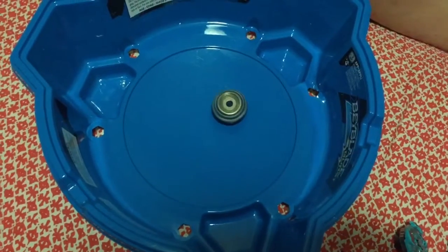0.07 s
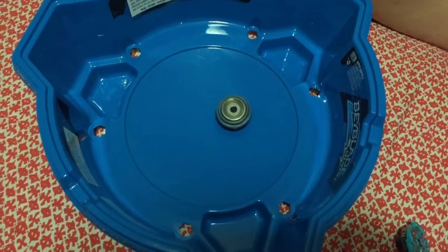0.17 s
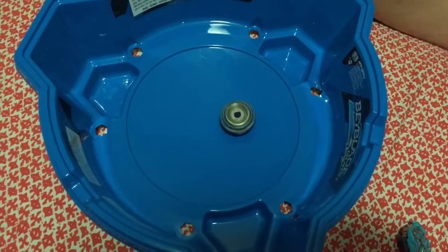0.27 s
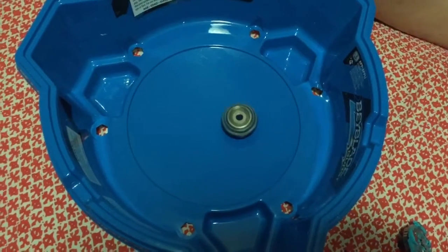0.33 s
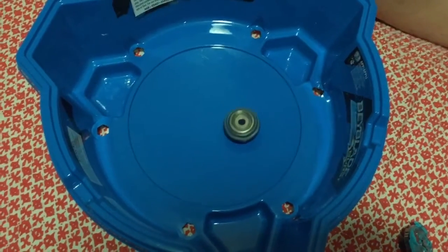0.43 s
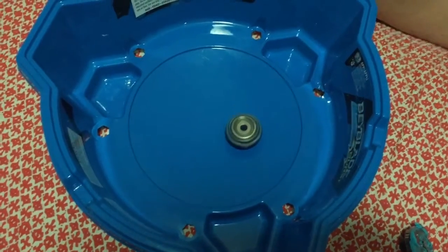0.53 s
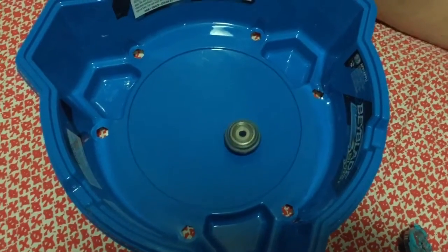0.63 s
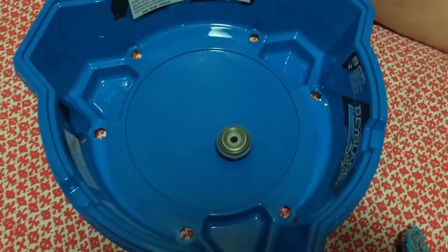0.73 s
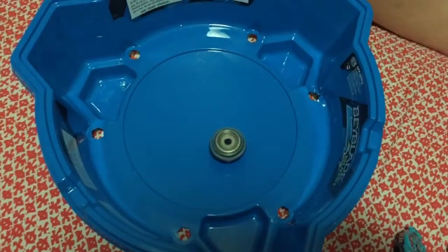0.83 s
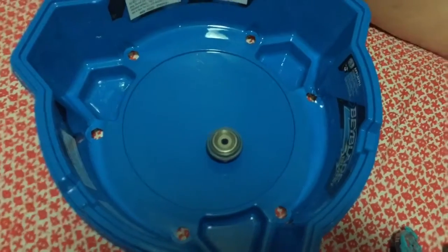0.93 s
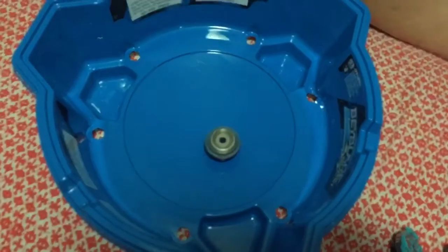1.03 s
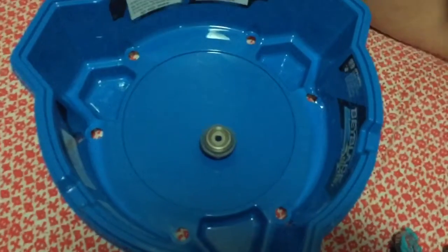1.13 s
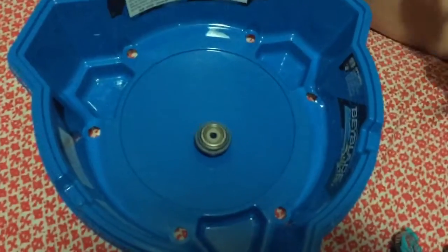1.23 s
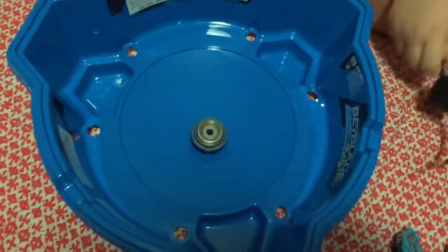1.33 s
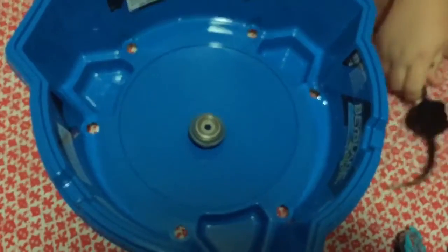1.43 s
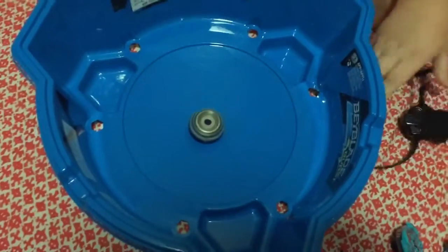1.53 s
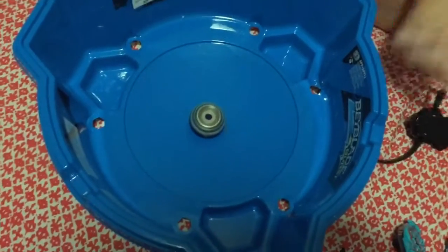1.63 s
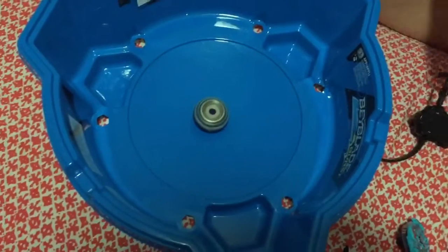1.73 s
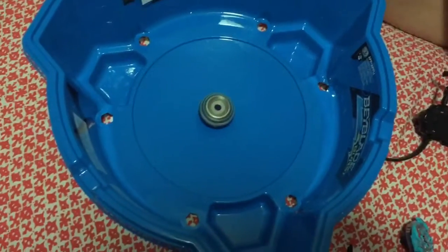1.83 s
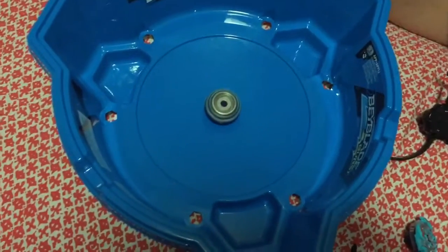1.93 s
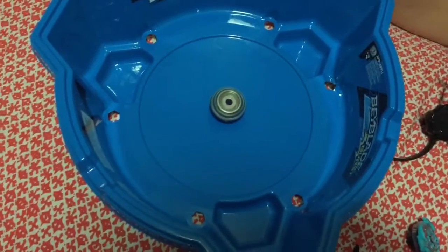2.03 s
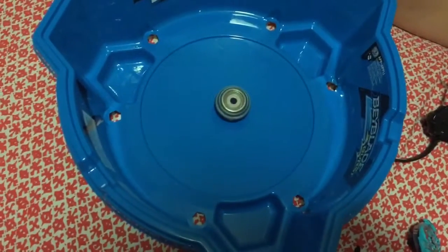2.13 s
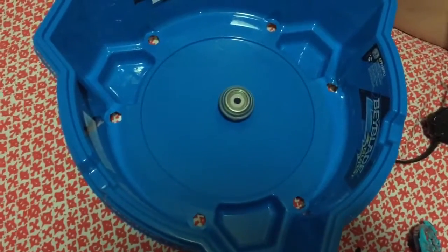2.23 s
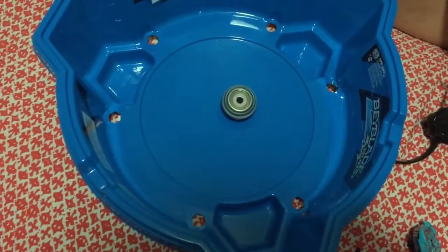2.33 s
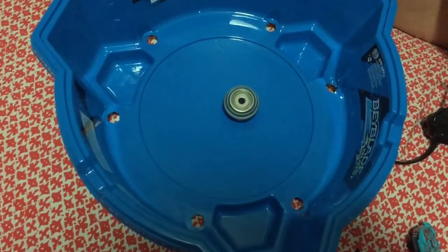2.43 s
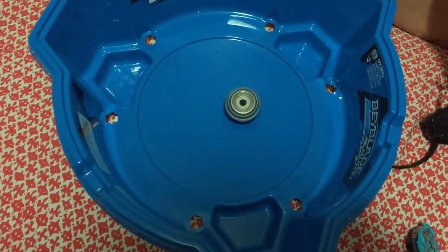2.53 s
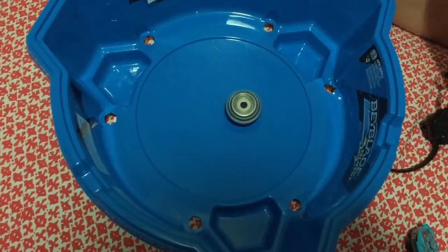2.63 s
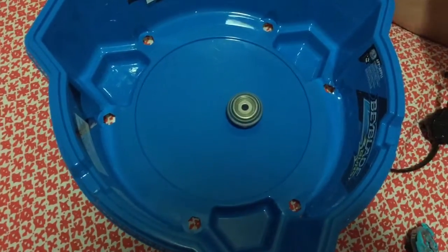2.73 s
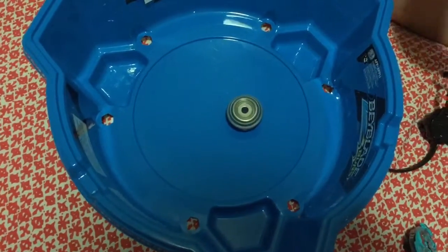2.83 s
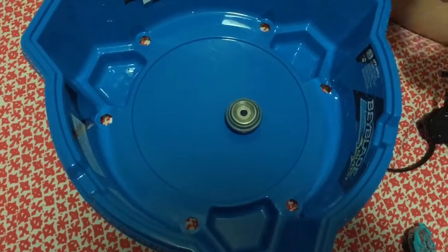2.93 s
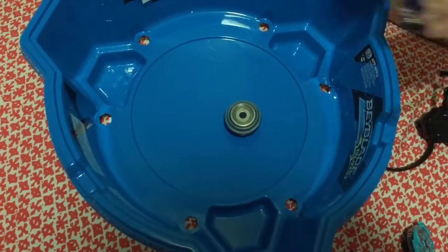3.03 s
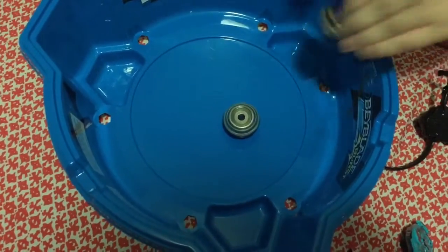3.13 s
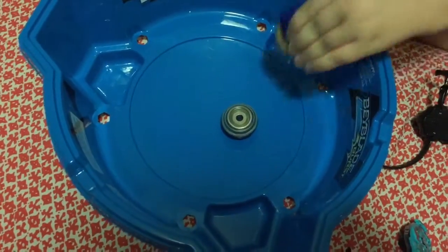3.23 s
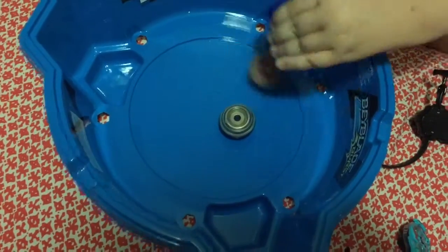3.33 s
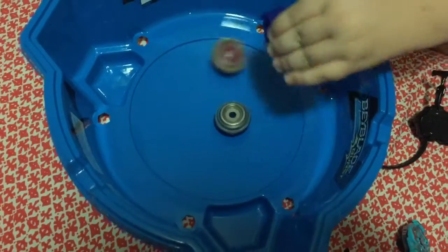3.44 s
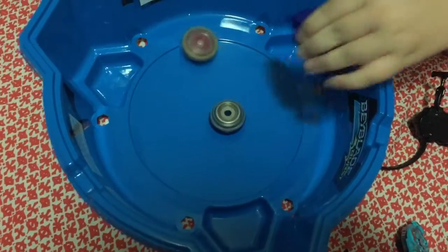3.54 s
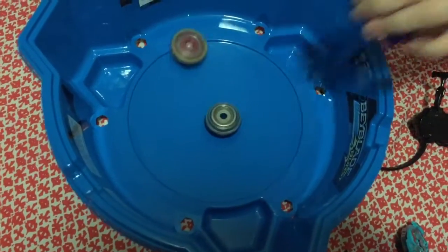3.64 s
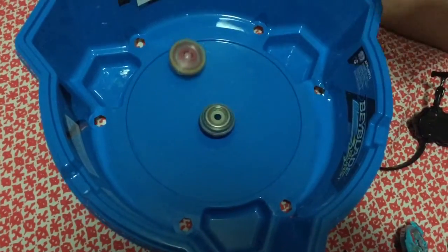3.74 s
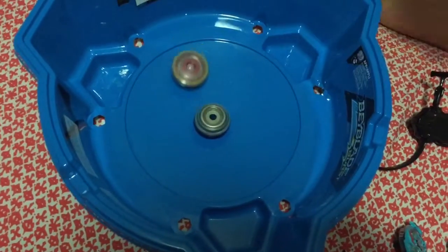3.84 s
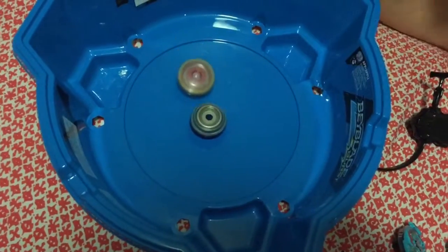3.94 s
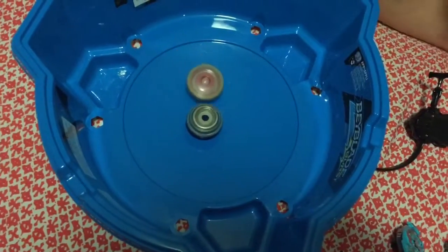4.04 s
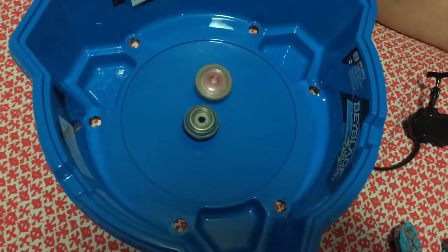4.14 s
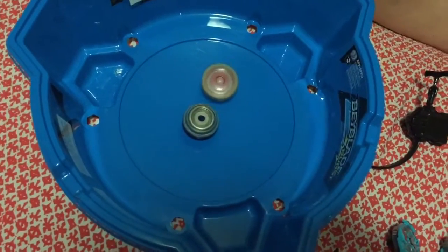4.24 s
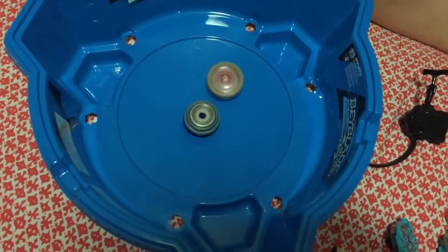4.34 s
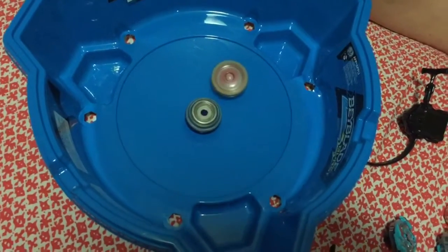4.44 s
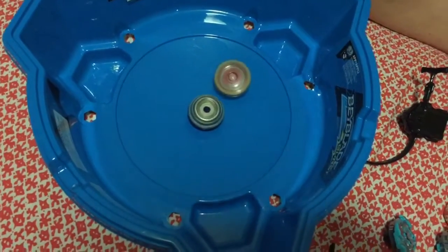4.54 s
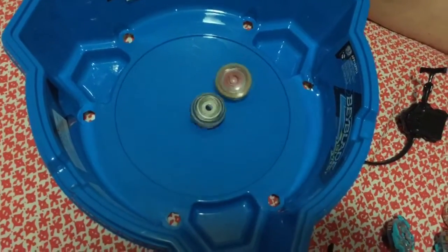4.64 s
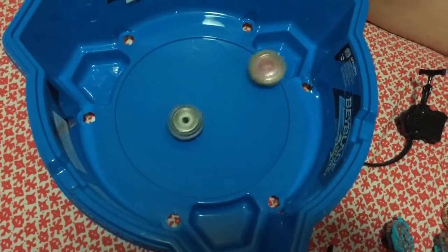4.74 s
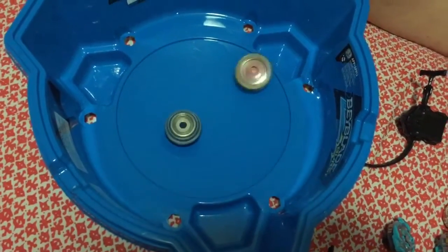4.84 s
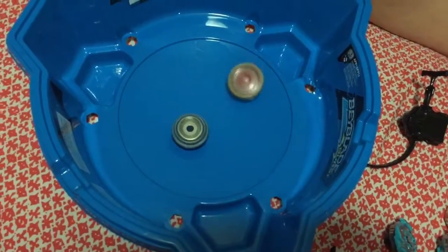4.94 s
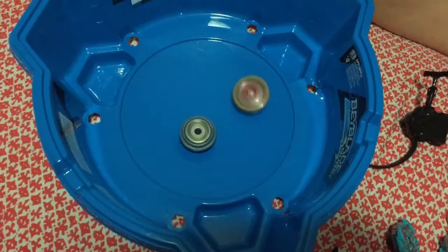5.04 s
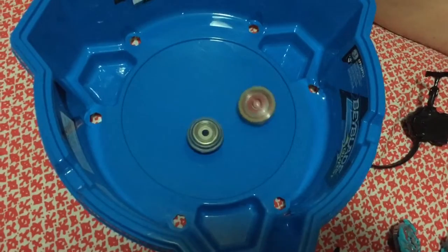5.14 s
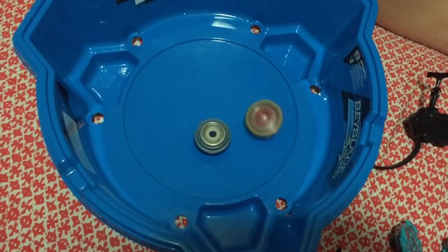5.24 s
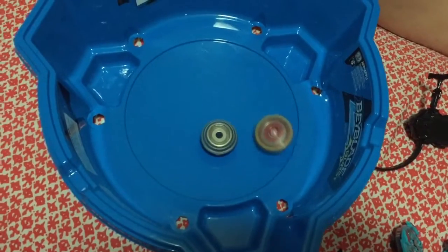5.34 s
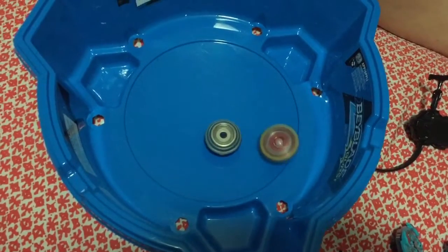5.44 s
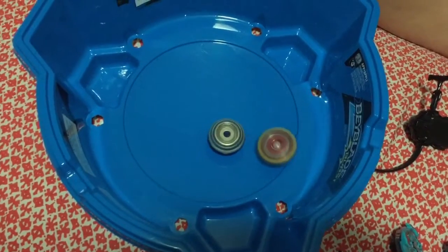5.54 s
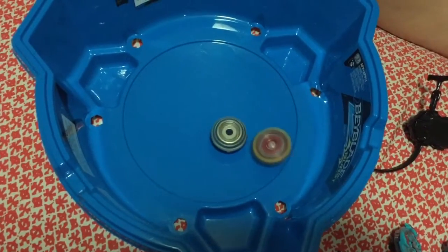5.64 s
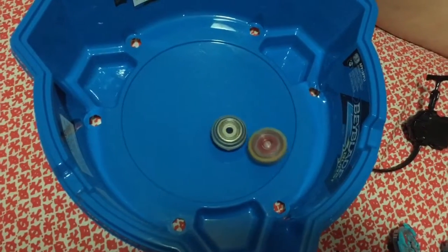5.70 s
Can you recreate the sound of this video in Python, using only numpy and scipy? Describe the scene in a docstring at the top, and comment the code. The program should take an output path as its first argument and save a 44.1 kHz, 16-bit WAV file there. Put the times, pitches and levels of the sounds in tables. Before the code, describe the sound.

Plastic clicks and a quick toothed rasp launch a second top into a hollow bowl, where it hums, scrapes and strikes the first sharply.

```python
"""Two spinning tops in a thin plastic bowl, heard from close above in a small room.
One top hums and grinds alone, its tip shaking the bowl, while the second is clicked onto its launcher.
Fingers rub and tick on the launcher's case, then the toothed ripcord rasps and the launcher's parts rattle.
The second top drops in, bounces and circles with a higher hum; two hard cracks and fainter ones mark top on top.
It skitters in small hops and grinds on the floor of the bowl; at the end the cord is fed back in, tooth by tooth."""
import sys
import numpy as np
from scipy import signal
from scipy.fft import rfft, irfft, next_fast_len
from scipy.io import wavfile
from scipy.ndimage import uniform_filter1d

SR = 44100
rng = np.random.default_rng(int(sys.argv[2]) if len(sys.argv) > 2 else 0)


def materialize(psi):
    """Save the field psi as 16-bit PCM at rate SR to the path in sys.argv[1].

    A 1-D psi becomes a single channel; in a 2-D psi each row is a channel.
    """
    bounded = np.clip(np.atleast_2d(psi).T, -1, 1)
    quanta = np.round(bounded * 32767).astype(np.int16)
    wavfile.write(sys.argv[1], SR, quanta)


N = 254456
TIME = np.arange(N) / SR

# tone colour of the second tip on the floor of the bowl: pitch_hz [Hz], level_db [dB]
GRIND_COLOUR = [(200, -11.5), (400, 2), (550, -9), (770, -5), (1120, -8.5), (2120, -12), (2790, -16),
                (3500, -16), (5000, -26), (10000, -34), (15000, -36)]
# resonances of the launcher's body: pitch_hz [Hz], width_hz [Hz], level_db [dB]
LAUNCHER_RINGS = [(2145, 42, 5.4), (2250, 23, 4.9), (2350, 12, 2), (2773, 45, 10), (2990, 290, 6.4),
                  (3900, 77, 2.3), (4300, 80, 5), (5320, 17, 1.7), (5725, 600, 5.7), (6170, 39, 5.1),
                  (6670, 60, 4.1)]
# how a run on the edge of the tip begins and ends
RUN_ATTACK_S, RUN_RELEASE_S = 0.022, 0.24


def amp(db):
    """Turn decibels into a gain."""
    return 10 ** (np.asarray(db) / 20)


def rms_one(x):
    """Scale a sound to unit power."""
    return x / np.sqrt(np.mean(x ** 2) + 1e-20)


def curve(rows):
    """Draw straight lines through a table of (time, value)."""
    rows = np.array(rows)
    return np.interp(TIME, rows[:, 0], rows[:, 1])


def swell(start, length, attack_s, release_s, power=1):
    """Rise, hold to the end of the length, then die away by 60 dB in the release time."""
    rise = np.clip((TIME - start) / attack_s, 0, 1) ** power
    return rise * amp(-60 * np.clip((TIME - start - length) / release_s, 0, 2))


def strokes(rows, attack_s, release_s, axis=2):
    """Gain through time of strokes (start, length, dB, ...); overlapping strokes add in power."""
    power = sum((amp(row[axis]) * swell(row[0], row[1], attack_s, release_s)) ** 2 for row in rows)
    return np.sqrt(power)


def drift(per_s):
    """Random wandering around zero, with per_s new random points a second joined by lines."""
    return np.interp(TIME * per_s, np.arange(4096), rng.standard_normal(4096))


def coloured(x, colour, rings=(), tilt_db=0):
    """Causal (minimum-phase) filter: a broad colour, resonant peaks and a tilt per octave above 1 kHz."""
    size = 2 * next_fast_len(len(x))
    hz = np.maximum(np.arange(size // 2 + 1) * SR / size, 10)
    points = np.array(colour)
    db = np.interp(np.log(hz), np.log(points[:, 0]), points[:, 1])
    db = db + tilt_db * np.log2(np.maximum(hz / 1000, 1))
    for centre, width, peak_db in rings:
        db = db + peak_db / (1 + (2 * (hz - centre) / width) ** 2)
    # folding the cepstrum forward in time puts all of the response after its cause
    cepstrum = irfft(db * np.log(10) / 20)
    cepstrum[1:size // 2] *= 2
    cepstrum[size // 2 + 1:] = 0
    return irfft(rfft(x, size) * np.exp(rfft(cepstrum)))[:len(x)]


def varied(rings, spread_db):
    """Every point of contact favours other resonances."""
    return [(hz, width, db + spread_db * rng.standard_normal()) for hz, width, db in rings]


def rubbed(friction, colour, rings, shift_db):
    """Friction through a body whose resonances trade strength as the contact moves."""
    ways = [coloured(friction, colour, varied(rings, shift_db)) for _ in range(3)]
    weights = amp(12 * np.array([drift(25) for _ in ways]))
    blend = sum(rms_one(way) * weight for way, weight in zip(ways, weights))
    return rms_one(blend / weights.sum(axis=0))


def add(out, s, sound):
    """Mix a sound in at a time."""
    start = int(s * SR)
    out[start:start + len(sound)] += sound[:max(N - start, 0)]


def clicks(rows, colour, rings, crack_s, ring_s, ring_db):
    """Hard contacts: a crack and a ring through the body, each dying by 60 dB in its time."""
    out, t = np.zeros(N), TIME[:4096]
    contact_s = 0.0002
    for s, db, tilt_db in rows:
        decay = amp(-60 * t / crack_s) + amp(ring_db - 60 * t / ring_s)
        burst = rng.standard_normal(len(t)) * decay * (1 - np.exp(-t / contact_s))
        hit = coloured(burst, colour, varied(rings, spread_db=2.5), tilt_db)
        # the level is that of a sine as strong as the loudest 1.5 ms
        loudest = np.sqrt(2 * uniform_filter1d(hit ** 2, size=66).max())
        add(out, s, amp(db) * hit / loudest)
    return out


def room_tone():
    """Faint steady background noise, its level set above the bass."""
    # tone colour: pitch_hz [Hz], level_db [dB]
    tone_colour = [(25, -1.5), (45, -8), (75, -11.5), (110, -8), (240, -27.5), (300, -20.5), (500, -34.5),
                   (1740, -34.5), (2760, -33), (5000, -42.5), (6050, -43), (15000, -49.5)]
    noise = coloured(rng.standard_normal(N), tone_colour)
    upper = signal.sosfilt(signal.butter(2, 400, "high", fs=SR, output="sos"), noise)
    return amp(-70) * noise / upper.std()


def turns(spin_hz, wander):
    """Angle of a top whose speed wavers."""
    return 2 * np.pi * np.cumsum(spin_hz * (1 + wander * drift(35))) / SR


def hum(angle, loudness, upright_db, runs, flutter_db):
    """The uneven tip shakes the bowl at multiples of the spin; on its edge they swell into a throb a turn."""
    # overtones: multiple_of_spin [count], level_db [dB]
    overtones = [(4, -1.5), (5, -3.5), (6, -12), (7, -14.5), (8, -16), (9, -26), (10, -21.5), (11, -26),
                 (12, -19)]
    base = amp(curve(loudness))
    third_run = strokes(runs, RUN_ATTACK_S, RUN_RELEASE_S, axis=3)
    buzz_run = strokes(runs, RUN_ATTACK_S, RUN_RELEASE_S, axis=4)
    third = np.hypot(base * amp(upright_db[0]), third_run)
    buzz = np.hypot(base * amp(upright_db[1]), buzz_run)
    low = base * np.sin(2 * angle) + third * np.sin(3 * angle)
    high = sum(amp(db + flutter_db * drift(12)) * np.sin(k * angle) for k, db in overtones)
    return np.sqrt(2) * (low + buzz * high)


def grinding(angle, runs, colour, repeat, throb_db, grain_db):
    """The tip scrapes hardest once each turn; its own roughness repeats, that of the floor does not."""
    # resonances of the bowl's floor: pitch_hz [Hz], width_hz [Hz], level_db [dB]
    floor_rings = [(759, 110, 5), (880, 160, 4.5), (1278, 64, 0.2), (1540, 650, 3.5), (2005, 210, 4.5),
                   (3330, 610, 6)]
    bite = ((1 + np.cos(angle)) / 2) ** 2
    tip = rng.standard_normal(size=800)  # roughness around the tip
    scratch = np.interp(angle / (2 * np.pi) % 1, np.linspace(0, 1, len(tip)), tip)
    floor_grit = rng.standard_normal(N) * amp(grain_db * drift(600))
    grit = repeat * scratch + (1 - repeat) * floor_grit
    scrape = rubbed(grit * amp(throb_db * bite), colour, floor_rings, shift_db=4.0)
    return strokes(runs, RUN_ATTACK_S, RUN_RELEASE_S) * scrape


def loading(grain_db):
    """Plastic slides and slips over the launcher's catch until the top snaps home."""
    # pushes over the catch: start_s [s], length_s [s], level_db [dB, before the slide's trim]
    pushes = [(0.532, .06, -41.5), (0.671, 0.079, -36.5), (0.798, 0.082, -34), (0.942, 0.083, -33)]
    # clicks of the catch: start_s [s], level_db [dB], brightness [dB per octave]
    catch_clicks = [(.261, -30, -0.5), (.519, -24.5, 1), (.545, -15, -1.5), (.595, -21, -.5),
                    (.671, -16.5, 2), (.706, -24.5, -0.5), (.727, -22, 0), (.741, -21.5, 1.5),
                    (.773, -25.5, 2), (.806, -25.5, 0), (.834, -20.5, 4), (.851, -21, 3.5),
                    (.916, -29.5, -0.5), (.965, -21.5, 6.5), (1.004, -17.5, 2), (1.017, -4.5, 1),
                    (1.026, -13.5, -4.5)]
    # tone colours of the slide and of the clicks: pitch_hz [Hz], level_db [dB]
    slide_colour = [(400, -40.5), (750, -21), (1120, -6), (1900, -7.5), (2650, -0.5), (3700, -8),
                    (4300, -4), (5100, -15.5), (7000, -14.5), (14000, -20.5), (16000, -25.5)]
    catch_colour = [(410, -46), (700, -27.5), (1140, -4.5), (2100, -3), (2560, 0), (3840, -9.5),
                    (4320, -9.5), (4920, -15.5), (6400, -9), (7010, -6.5), (13700, -13.5), (15000, -10.5),
                    (16000, -27.5)]
    # resonances of the catch: pitch_hz [Hz], width_hz [Hz], level_db [dB]
    catch_rings = [(1170, 23, 8), (1306, 54, 9), (2630, 310, 4), (3100, 90, -1.5), (3440, 99, 3),
                   (4230, 86, 7), (7080, 260, 6.5), (7900, 87, 5), (8900, 330, 6.5), (11430, 200, 2.5)]
    rub = rng.standard_normal(N) * amp(grain_db * drift(350))
    slide = strokes(pushes, attack_s=0.017, release_s=0.21)
    slide = slide * rubbed(rub, slide_colour, catch_rings, shift_db=2.5)
    slips = []  # three at random moments in each push, louder and brighter than the push
    slip_db, slip_tilt_db = 3.5, 4
    for s, length, db in pushes:
        for when in rng.random(size=3):
            slips.append((s + length * when, db + slip_db, slip_tilt_db))
    snaps = clicks(catch_clicks + slips, catch_colour, catch_rings, crack_s=0.015, ring_s=.06, ring_db=-22)
    return amp(-1.0) * slide + snaps


def hops(jitter_s, spread_db, tilt_spread_db):
    """Small, uneven, fading blows of a skittering tip, as rows like those of the hard blows."""
    # spells of skittering: start_s [s], length_s [s], first_thump_db [dB]
    skitters = [(3.577, 0.092, -21.5), (4.74, 0.081, -27), (4.953, 0.18, -25)]
    hop_s, fade_db_per_s = .027, 39
    first_tick_db, mean_tilt_db = -30, -2
    rows = []
    for start, length, db in skitters:
        for k, (late, strong, bright) in enumerate(rng.standard_normal(size=(12, 3))):
            since_s = k * hop_s
            if since_s < length:
                change_db = spread_db * strong - fade_db_per_s * since_s
                tilt_db = mean_tilt_db + tilt_spread_db * bright
                rows.append((start + since_s + jitter_s * late, db + change_db, tilt_db,
                             first_tick_db + change_db))
    return rows


def bounces():
    """Hard blows and hops on the bowl tick and set its thin floor booming."""
    # hard blows: start_s [s], thump_db [dB], pitch_tilt [dB per octave], tip_tick_db [dB]
    hard_blows = [(1.02, -33, -2.5, -25), (3.274, -40.5, -8.5, -25), (3.377, -1.5, 0, -9.5),
                  (3.401, -11, -8, -31), (3.471, -21, -27, -25), (3.494, -6.5, -1.5, -18),
                  (3.543, -21, 4, -30.5), (4.069, -20.5, -1, -22), (4.69, -11.5, -3, -15.5),
                  (4.796, -20, 4, -28), (4.852, -16.5, 5, -19.5), (4.864, -20.5, -4, -32),
                  (4.908, -25, -10.5, -25)]
    # ways the bowl vibrates: pitch_hz [Hz], level_db [dB], time_to_fall_60_db_s [s]
    bowl_modes = [(104, -8, 0.48), (115, -10.5, 0.21), (157, -6.5, 0.13), (191.4, -1, .12),
                  (222, -3.5, 0.12), (262, -1, 0.094), (290, -3.5, 0.22), (385, -9, 0.1), (466, -16, 0.053),
                  (663, -17.5, 0.084), (864, -20.5, 0.069), (950, -20, 0.048)]
    out, t = np.zeros(N), TIME[:12000]
    blows = hard_blows + hops(jitter_s=0.0037, spread_db=0.5, tilt_spread_db=5.5)
    mode_changes_db = rng.normal(0, 2.8, size=(64, len(bowl_modes)))
    for (s, db, tilt_db, tick_db), changes_db in zip(blows, mode_changes_db):
        boom = 0
        for (hz, mode_db, t60), change_db in zip(bowl_modes, changes_db):
            level = amp(mode_db + change_db + tilt_db * np.log2(hz) - 60 * t / t60)
            boom = boom + level * np.sin(2 * np.pi * hz * t)
        add(out, s, amp(db) * boom / abs(boom).max())
    ticks = [(s, tick_db, 0) for s, db, tilt_db, tick_db in blows]
    return out + clicks(ticks, GRIND_COLOUR, (), crack_s=0.0022, ring_s=0.033, ring_db=-17)


def gripping(grain_db):
    """Skin sticks and slips on the hollow case, which knocks and ticks as it is picked up and aimed."""
    # fingers rubbing: start_s [s], length_s [s], level_db [dB]
    finger_rubs = [(1.15, 0.26, -60), (1.245, 0.08, -56.5), (1.472, 0.019, -52)]
    # soft knocks on the case: start_s [s], level_db [dB], brightness [dB per octave]
    soft_knocks = [(1.316, -48, -3), (1.484, -33, -15), (1.494, -45.5, -15)]
    # small ticks of the launcher: start_s [s], level_db [dB], brightness [dB per octave]
    small_ticks = [(1.632, -33.5, -1), (1.889, -45, 5.5), (2.084, -44, 0.5), (2.136, -46, 5.5),
                   (2.149, -46.5, -3), (2.17, -51, -2), (2.349, -39.5, 5), (2.794, -49, -8)]
    # tone colours of the case and of the ticks: pitch_hz [Hz], level_db [dB]
    case_colour = [(500, -29.5), (950, -32), (1300, -3.5), (1650, -4.5), (2000, -2), (2600, -0.5),
                   (4300, -13), (7000, -21), (15000, -20)]
    tick_colour = [(600, -43), (1900, -19), (2400, 2), (2950, 6), (3700, -9), (4600, -17), (6100, -6),
                   (8000, -17), (10500, -25.5), (16000, -33)]
    # resonances of the case: pitch_hz [Hz], width_hz [Hz], level_db [dB]
    case_rings = [(1244, 190, 4.4), (1630, 330, 2.9), (1870, 230, 4.2), (3120, 270, 3.2)]
    rub = rng.standard_normal(N) * amp(grain_db * drift(300))
    rustle = strokes(finger_rubs, attack_s=0.0084, release_s=0.11)
    rustle = rustle * rubbed(rub, case_colour, case_rings, shift_db=2.5)
    knocks = clicks(soft_knocks, case_colour, case_rings, crack_s=0.019, ring_s=0.062, ring_db=-23)
    ticks = clicks(small_ticks, tick_colour, (), crack_s=0.013, ring_s=0.038, ring_db=-24)
    return rustle + knocks + ticks


def ratchet(teeth_per_s, colour, tooth_db, grain_db):
    """Each tooth of the cord flicks the gear and fades by tooth_db before the next."""
    tooth = np.cumsum(teeth_per_s) / SR % 1
    rasp = rng.standard_normal(N) * amp(-tooth_db * tooth + grain_db * drift(300))
    return rms_one(coloured(rasp, colour, LAUNCHER_RINGS))


def launching():
    """The launcher's parts knock while the cord speeds up evenly until it leaves the gear, rasping louder."""
    # launcher parts knocking: start_s [s], level_db [dB], brightness [dB per octave]
    part_knocks = [(3.113, -27, -3.5), (3.14, -30, -3), (3.178, -22, -3.5), (3.197, -15, -2.5),
                   (3.217, -11.5, .5), (3.241, -7, -1), (3.25, -7.5, 3.5), (3.265, -0.5, 1),
                   (3.272, 0, 1.5), (3.293, -4.5, -5), (3.302, -4.5, -0.5), (3.313, -5, -1.5),
                   (3.35, -14, -4), (3.37, -6.5, -5), (3.381, -7, -3.5), (3.393, -10.5, -4.5),
                   (3.408, -12, -6.5), (3.426, -11, -5), (3.45, -18, -4), (3.481, -16, -6),
                   (3.541, -26.5, -7), (3.596, -25, -9.5), (3.691, -30, -10), (5.733, -27, -1)]
    # tone colour of the launcher: pitch_hz [Hz], level_db [dB]
    launcher_colour = [(240, -48.5), (450, -29), (850, -23.5), (1380, -22.5), (2150, -6.5), (2850, -2),
                       (4100, -3), (4600, -8), (5870, -1.5), (7600, -7.5), (8800, -7), (12000, -13.5),
                       (16000, -14.5)]
    rattle = clicks(part_knocks, launcher_colour, LAUNCHER_RINGS, crack_s=0.017, ring_s=.035, ring_db=-21.0)
    start_s, end_s, top_teeth_per_s = 3.132, 3.314, 1500
    pull_s = end_s - start_s
    speed = np.clip((TIME - start_s) / pull_s, 0, 1)
    force = swell(start_s, pull_s, pull_s, release_s=0.028, power=1.52)
    rasp = ratchet(top_teeth_per_s * speed, launcher_colour, tooth_db=15, grain_db=5)
    return rattle + amp(-12.5) * force * rasp


def second_turns():
    """Friction slows the second top; every jolt takes more speed and leaves a fading wobble."""
    # collisions: start_s [s], spin_lost_hz [turns per s], added_wobble [share of the speed]
    jolts = [(4.068, 1.0, 0.0024), (4.691, 2.9, .07)]
    settled_spin_hz, sag_hz_per_s, settled_s = 71.6, 6.6, 3.7
    wobble, wobble_fade_s = .006, .5
    spin_hz = settled_spin_hz - sag_hz_per_s * (TIME - settled_s)
    for s, lost_hz, shake in jolts:
        spin_hz = spin_hz - lost_hz * (TIME > s)
        wobble = wobble + shake * (TIME > s) * np.exp(-abs(TIME - s) / wobble_fade_s)
    return turns(spin_hz, wobble)


def clashing(buzz_db, buzz_s):
    """The rims crack together, and their loose layers buzz briefly after."""
    # top against top: start_s [s], level_db [dB], brightness [dB per octave]
    clash_hits = [(4.069, -4, 2), (4.665, -40, -7), (4.6807, -8, 0), (4.688, -1, -6.5),
                  (4.6905, -7.5, 13.5), (4.796, -26, -3), (5.158, -43, 11), (5.444, -36.5, 12)]
    # tone colour of a clash: pitch_hz [Hz], level_db [dB]
    clash_colour = [(300, -36), (900, -14.5), (2000, -9), (3000, -0.5), (4600, 2), (6500, 4.5), (8000, 1.5),
                    (11000, -1), (15500, -8.5)]
    # resonances of the tops: pitch_hz [Hz], width_hz [Hz], level_db [dB]
    top_rings = [(2585, 200, 7.5), (5370, 200, 7.6), (5796, 320, 7.7), (7200, 270, 11), (8770, 600, 3),
                 (9640, 300, 3.3), (12640, 640, 4.6), (14550, 490, 9.6), (15460, 210, 5)]
    crack = clicks(clash_hits, clash_colour, top_rings, crack_s=0.01, ring_s=0.022, ring_db=-30.0)
    buzz = clicks(clash_hits, clash_colour, (), crack_s=0.049, ring_s=buzz_s, ring_db=6.5)
    return crack + amp(buzz_db) * buzz


def feeding_cord():
    """The cord is fed back in at an even pace, its teeth pressed ever harder on the gear."""
    # tone colour of the slow teeth: pitch_hz [Hz], level_db [dB]
    feed_colour = [(500, -37), (1200, -11), (2200, -4), (3000, -0.5), (4500, -4), (6000, -1.5), (9000, -1),
                   (12000, -13.5), (16000, -25)]
    start_s, swell_s, teeth_per_s = 5.579, .18, 100
    press = np.clip((TIME - start_s) / swell_s, 0, 1)
    return amp(-43.5) * press * ratchet(np.full(N, teeth_per_s), feed_colour, tooth_db=13, grain_db=3)


def room(x, t60, treble_t60, wet_db, delay_s):
    """Diffuse reflections that build up over delay_s and die sooner in the treble."""
    t, tail = TIME[:SR // 2], 0
    edges_hz = [300, 1500, 4000, 8000, 12000, 18000]
    decays_s = np.linspace(t60, treble_t60, len(edges_hz) - 1)
    for low, high, decay_s in zip(edges_hz, edges_hz[1:], decays_s):
        band_pass = signal.butter(2, [low, high], "band", fs=SR, output="sos")
        band = signal.sosfilt(band_pass, rng.standard_normal(len(t)))
        tail = tail + band * amp(-60 * t / decay_s)
    tail = tail * np.clip(t / delay_s, 0, 1) ** 2
    return amp(wet_db) * signal.fftconvolve(x, tail / np.linalg.norm(tail))[:N]


def scene():
    """Tops, launcher and bowl in the room; each top's hum is strongest near twice its spin."""
    # hum at twice the spin, before the mix below: start_s [s], level_db [dB]
    first_loudness = [(0, -51), (.15, -43), (.55, -46.5), (.66, -52), (1.15, -54), (1.87, -46), (2.35, -48),
                      (2.84, -53.5), (2.95, -69.5), (3.04, -52.5), (3.3, -59.5), (3.45, -87)]
    second_loudness = [(3.62, -95.5), (3.82, -52.5), (4.14, -47.5), (4.33, -35), (4.6, -41), (4.88, -42),
                       (5.081, -35.5), (5.161, -49), (5.22, -36.5), (5.42, -45), (5.52, -64), (5.77, -62)]
    # runs on the edge of the tip, before the mix below:
    # start_s [s], length_s [s], grinding_db [dB], third_multiple_db [dB], overtones_db [dB]
    first_runs = [(0.074, .29, -61.5, -55, -61), (0.418, 0.16, -57.5, -53, -62),
                  (0.668, 0.056, -73.5, -47.5, -57.5)]
    second_runs = [(3.5, 0.13, -49, -52, -45), (3.74, .31, -63.5, -75, -75), (4.17, 0.039, -52, -47, -60.5),
                   (4.24, .21, -52, -47.5, -59), (4.69, 0.08, -38.5, -54, -54),
                   (4.848, 0.038, -40, -56, -40.5), (4.94, 0.16, -43, -45, -48.5),
                   (5.173, 0.11, -42, -47.5, -48), (5.3, 0.13, -47, -38.5, -50.5),
                   (5.43, 0.11, -64, -49.5, -44)]
    # tone colour of the first tip on the floor of the bowl: pitch_hz [Hz], level_db [dB]
    first_grind_colour = [(290, -50.5), (500, -28), (549, -31), (635, -3), (1300, -4.5), (1990, -5.5),
                          (3050, -18), (3300, -17.5), (5550, -22.5), (12000, -38), (15600, -68),
                          (22000, -120)]
    # friction slows the first top steadily
    first_spin_hz, first_sag_hz_per_s = 53.56, 1.85
    first = turns(first_spin_hz - first_sag_hz_per_s * TIME, wander=0.0023)
    second = second_turns()
    # an upright top has only a weak third multiple and weak overtones (dB against its hum)
    first_hum = hum(first, first_loudness, (-17.5, -27.5), first_runs, flutter_db=5.5)
    second_hum = hum(second, second_loudness, (-21, -25), second_runs, flutter_db=6.0)
    hums = first_hum + amp(-1.0) * second_hum
    whirr = grinding(first, first_runs, first_grind_colour, repeat=.75, throb_db=14, grain_db=2)
    scrape = grinding(second, second_runs, GRIND_COLOUR, repeat=.45, throb_db=11, grain_db=4.5)
    launcher = loading(grain_db=4.5) + gripping(grain_db=5) + launching() + feeding_cord()
    clashes = clashing(buzz_db=-23.0, buzz_s=0.15)
    others = whirr + amp(-4) * scrape + launcher + bounces()
    # the bowl's wall keeps part of a clash out of the room
    echo = room(others + amp(-1.5) * clashes, t60=0.16, treble_t60=0.13, wet_db=-13.5, delay_s=0.0096)
    return (others + clashes + hums + echo + room_tone())[None]


def record(dry):
    """The microphone drops the deep bass, the loudest peaks are rounded and the top is cut."""
    bass_hz, ceiling, cutoff_hz = 66, .9, 17000
    heard = signal.sosfilt(signal.butter(5, bass_hz, "high", fs=SR, output="sos"), dry)
    rounded = ceiling * np.tanh(heard / ceiling)
    return signal.sosfilt(signal.cheby2(16, 70, cutoff_hz, fs=SR, output="sos"), rounded)


dry = scene()
out = record(dry)
materialize(out)
```